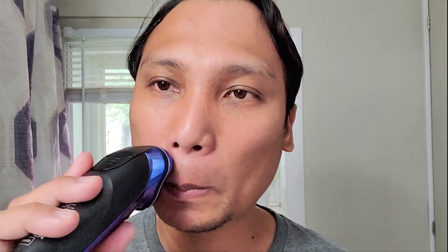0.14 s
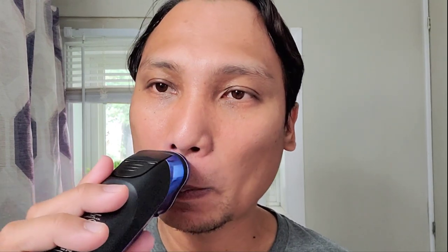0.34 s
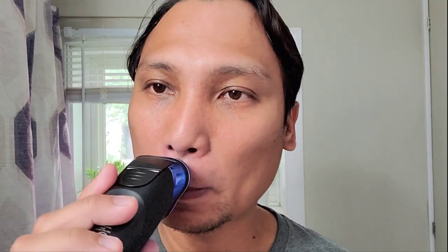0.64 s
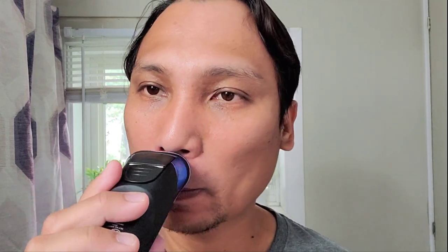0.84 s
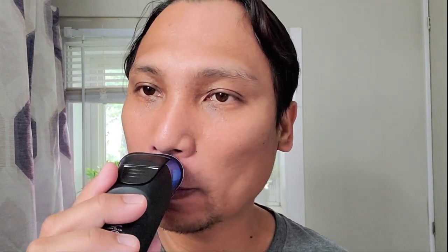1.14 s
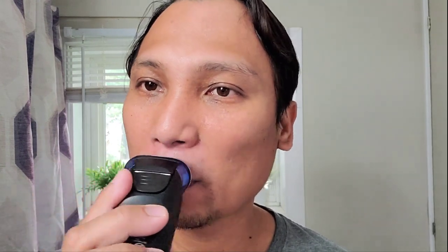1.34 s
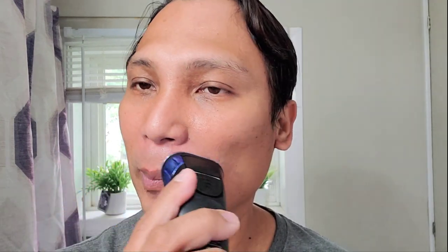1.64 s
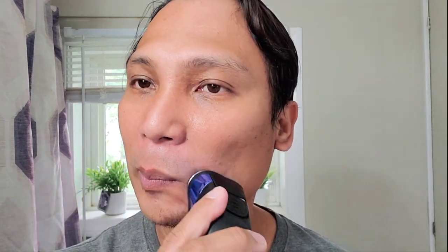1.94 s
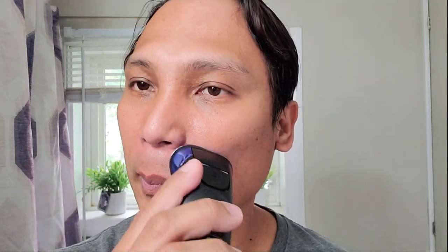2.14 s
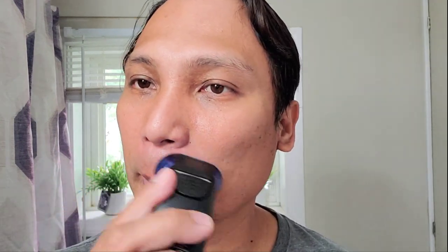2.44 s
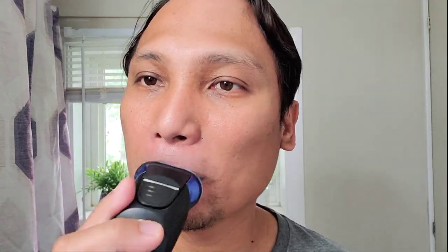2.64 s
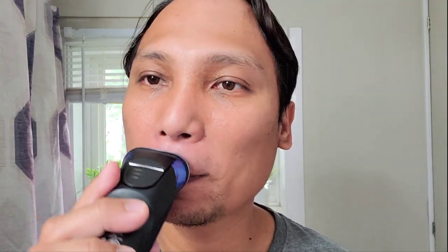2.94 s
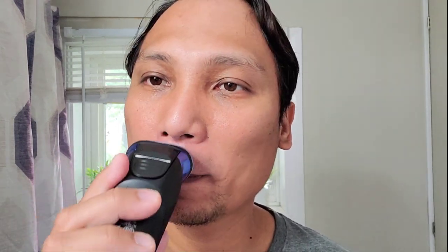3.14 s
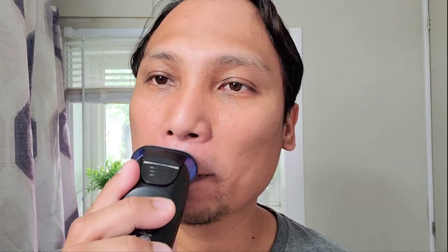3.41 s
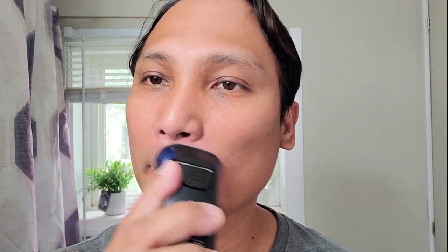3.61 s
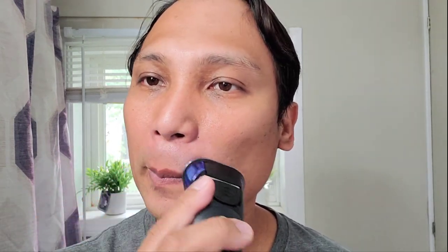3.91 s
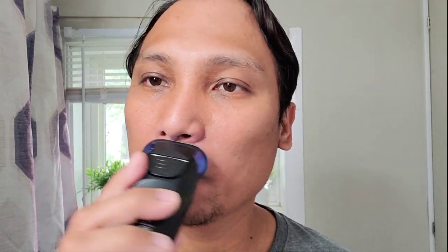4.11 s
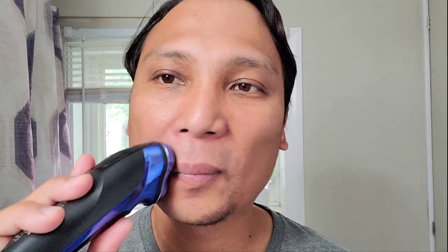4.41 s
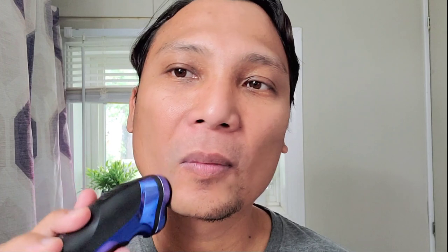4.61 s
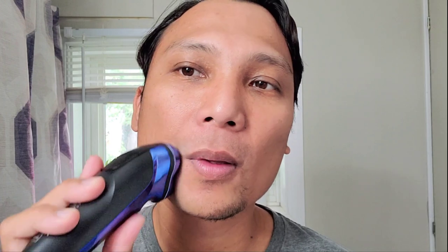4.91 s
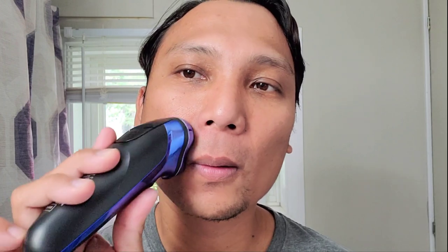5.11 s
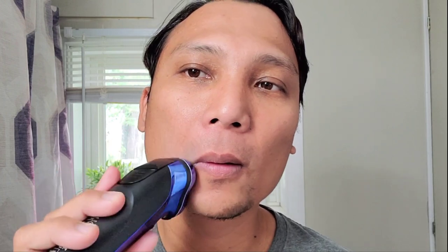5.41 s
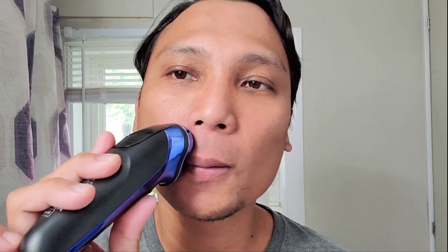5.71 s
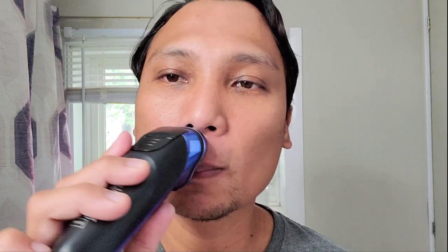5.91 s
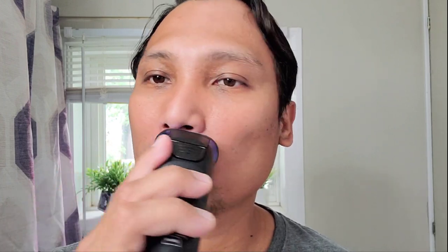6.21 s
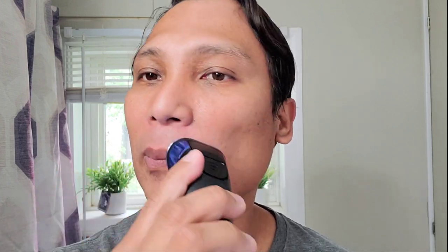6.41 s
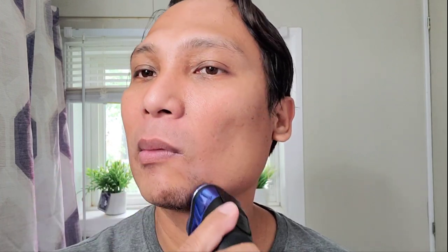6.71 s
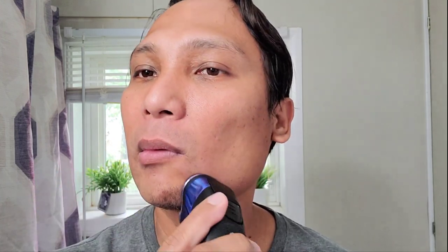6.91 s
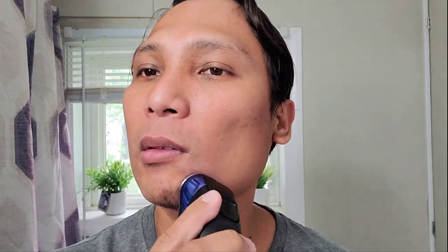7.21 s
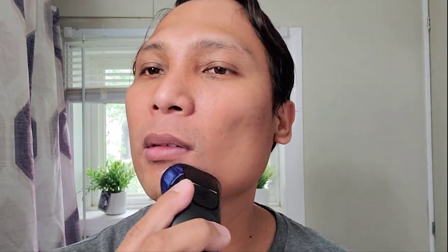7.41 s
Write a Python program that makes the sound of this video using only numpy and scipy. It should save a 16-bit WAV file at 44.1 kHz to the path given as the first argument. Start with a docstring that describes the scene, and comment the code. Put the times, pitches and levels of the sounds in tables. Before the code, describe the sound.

Close, bright shaver buzz with fluttering gear whine and metallic hiss over the lip, turning rougher and cracklier as it reaches the chin.

```python
"""A cordless rotary shaver works over lip and then chin, close to two microphones in a small room.
From the start its meshing gears whine with a throb at each wheel turn, and random contacts excite the
resonances of body and steel caps as rattle, ring and hiss; brief squeals come early and late.
Midway one cap tips off the skin and rings freely. At the end, on the chin, the crackle of cut stubble
grows, caps scrape and bristles snap: clumped impulses through the resonances of hair, cap and head."""
import sys
import numpy as np
from scipy import signal
from scipy.fft import rfft, irfft
from scipy.io import wavfile
from scipy.ndimage import map_coordinates

SR = 44100
rng = np.random.default_rng(int(sys.argv[2]) if len(sys.argv) > 2 else 0)


def to_wav(sig):
    """Store sig (one row per channel, or 1-D mono) as 16-bit WAV at the path in sys.argv[1].

    Samples outside -1..1 are clipped; the rate is SR.
    """
    pcm = np.clip(np.atleast_2d(sig), -1, 1) * 32767
    pcm = np.round(pcm).astype(np.int16)
    wavfile.write(sys.argv[1], SR, pcm.T)  # frames by channels


N = 332955
TIME = np.arange(N) / SR   # s
HZ = np.maximum(np.arange(N // 2 + 1) * SR / N, 1)
SIDES = np.array([[1], [-1]])   # sign of a left-right difference
WHEEL_RATIO, CUTTER_RATIO = 13 / 48, 20 / 51   # turns per motor turn

# Motor slowed by pressure on the skin. Each row: time in seconds, mean speed in turns per second.
MOTOR_SPEED = [(0.0, 117.7), (0.23, 117.0), (0.7, 118.0), (1.7, 118.7), (2.27, 116.85), (2.48, 118.5),
               (2.6, 117.3), (2.78, 118.35), (3.45, 117.4), (3.78, 117.6), (4.1, 116.5), (4.3, 117.1),
               (4.47, 116.6), (4.7, 117.9), (5.0, 116.9), (5.35, 117.0), (5.8, 116.3), (6.48, 116.5),
               (6.7, 115.2), (6.97, 114.8), (7.12, 115.35), (7.55, 115.55)]
# Low sounds. Each row: time in seconds, relative room rumble in dB, relative handle drone in dB.
LOW_LEVELS = [(0.0, -70.5, -80), (0.4, -68.5, -74), (1.9, -68, -74.5), (3.05, -70, -74.5),
              (3.2, -71.5, -76), (4.0, -71.5, -74.5), (5.8, -74, -82), (6.8, -75.5, -78), (7.3, -72.5, -80),
              (7.55, -74, -73)]
# Shaver moving across the face. Each row: time in seconds, left minus right in dB before scaling.
FACE_PLACE = [(0.0, -14), (0.8, -2), (1.15, -2), (2.04, 1.5), (2.46, 2), (4.28, 0), (4.42, -11),
              (4.85, -12), (5.5, -15), (5.85, -19), (6.27, -5.5), (6.65, 0.5), (7.55, 2)]
# Cutters biting into stubble. Each row: centre in seconds, half length in seconds, relative crackle in dB.
STUBBLE_BITES = [(1.754, 0.096, -58.5), (1.977, 0.03, -58), (2.267, 0.016, -56), (2.675, 0.034, -58),
                 (3.378, .03, -62), (4.15, 0.053, -58.5), (6.73, 0.042, -62), (6.816, 0.049, -56),
                 (6.883, 0.032, -56), (6.983, .035, -74), (7.185, 0.045, -53.5), (7.44, 0.024, -54),
                 (7.491, 0.018, -50.5), (7.54, 0.027, -52.5)]
# Bristles against a cap. Each row: resonance in Hz, width in Hz, relative level in dB.
BRISTLE_MODES = [(3120, 550, -3), (4020, 400, 4), (4700, 440, 10), (6150, 700, 2), (7200, 940, 0.5)]


def from_db(db):
    """Decibels are logarithmic: 20 dB is a factor of ten in amplitude."""
    return np.exp(np.asarray(db) * (np.log(10) / 20))


def rms_one(x):
    """Normalization to unit mean power."""
    return x / np.sqrt(np.mean(x ** 2) + 1e-20)


def in_time(rows):
    """Linear interpolation of each column of a curve at every sample."""
    s, *columns = np.transpose(rows)
    return [np.interp(TIME, s, column) for column in columns]


def over_hz(points):
    """Interpolation of a short spectrum on a logarithmic frequency axis."""
    hz, value = np.transpose(points)
    return np.interp(np.log(HZ), np.log(hz), value)


def drift(rate):
    """Low-passed noise: smooth chance that changes about `rate` times a second; unit rms."""
    pole = np.exp(-80 * np.pi * rate / SR)   # on a grid of every 40th sample
    noise = rng.standard_normal(N // 40 + 2002)
    slow = signal.lfilter([1], [1, -2 * pole, pole * pole], noise)[2000:]
    return np.interp(np.arange(N) / 40, np.arange(len(slow)), rms_one(slow))


def swells(rows):
    """Gaussian gain envelopes of (centre s, half length s, dB), summed in power."""
    power = sum(from_db(db) ** 2 * np.exp(-np.minimum(((TIME - s) / half) ** 2, 50))
                for s, half, db in rows)
    return np.sqrt(power)


def strikes(rows, decay_s):
    """Impulsive excitation of (s, dB): sudden onset, then exponential decay."""
    return sum(from_db(db) * (TIME >= s) * np.exp(-np.abs(TIME - s) / decay_s) for s, db in rows)


def resonances(modes):
    """Modal response: the powers of steep-sided resonances add."""
    power = sum((from_db(db) / (1 + (2 * (HZ - hz) / width) ** 2)) ** 2 for hz, width, db in modes)
    return np.sqrt(power)


def grains(per_s, spread_db):
    """Shot noise: two independent streams of random contacts of uneven size."""
    born = rng.random((2, N)) < per_s / SR
    size_db = spread_db * np.minimum(rng.exponential(1, (2, N)), 4)
    return born * rng.choice([-1, 1], (2, N)) * from_db(size_db)


def radiate(contacts, gain):
    """Body filtering and spatial coherence: the two sides are more alike in the bass; unit rms."""
    # Each row: frequency in Hz, left-right likeness.
    coherence = [(30, 0.93), (60, 0.82), (200, 0.7), (400, 0.55), (750, 0.77), (1500, 0.7), (2400, 0.72),
                 (4200, 0.52), (7000, 0.22), (15000, 0.05)]
    # Each row: frequency in Hz, left minus right in dB.
    side_balance = [(60, -1.5), (300, -0.5), (1100, -1.5), (2000, 0.5), (3500, -0.5), (4400, -4), (5400, 1),
                    (6800, -1), (7600, 11), (8300, 7), (9200, 1), (11800, 1), (14300, -3.5), (15600, -0.5)]
    mid, side = rfft(contacts) * gain
    alike = np.clip(over_hz(coherence), -1, 1)
    pair = np.sqrt(1 + alike) * mid + SIDES * np.sqrt(1 - alike) * side
    return rms_one(irfft(pair * from_db(SIDES * over_hz(side_balance) / 2), N))


def tone(turns, fading, rate, lead=0.):
    """Multipath fading: reflections off moving hand and face alter a sine on each side; rms 1."""
    angle = (2 * np.pi * ((turns + rng.random()) % 1)).astype(np.float32)
    cos, sin = np.cos(angle), np.sin(angle)
    pair = []
    for shift in (lead / 2, -lead / 2):
        in_phase = np.cos(shift) + fading * drift(rate)
        quadrature = np.sin(shift) + fading * drift(rate)
        pair.append(in_phase * cos - quadrature * sin)
    return np.sqrt(2 / (1 + 2 * fading ** 2)) * np.array(pair)


def face_echo(x):
    """Comb filtering: reflections over swaying paths keep shifting the colour; unit rms."""
    # Reflections off face, hand and wall.
    # Each row: mean delay in seconds, sway of the delay in seconds, strength as a share.
    echo_paths = [(.0013, 0.00012, 0.22), (.0047, 0.0001, 0.22), (.0085, .00008, 0.18)]
    out = x.copy()
    for delay, sway, strength in echo_paths:
        for side in range(2):
            lag = delay * rng.uniform(.85, 1.15) + sway * drift(0.45)
            out[side] += strength * np.interp(TIME - lag, TIME, x[side])
    return rms_one(out)


def arrive(x):
    """Interaural-type delay: the moving head reaches the two microphones at different moments."""
    # Each row: time in seconds, delay of the right behind the left in seconds.
    right_delay = [(0.0, 0.0), (1.5, 0.0), (1.8, 7.5e-5), (2.55, 8e-5), (2.9, -1e-5), (3.55, -1e-5),
                   (3.9, 8e-5), (4.2, 8e-5), (4.6, -2.5e-5), (5.9, -2.5e-5), (6.5, 7e-5), (7.55, 8e-5)]
    lag_s, = in_time(right_delay)
    right = map_coordinates(x[1], [(TIME - lag_s) * SR], order=5, mode="nearest")
    return np.array([x[0], right])


def room_rumble():
    """Background noise: random pressure shaped by a spectrum that is strongest in the bass."""
    # Each row: frequency in Hz, relative level in dB per Hz.
    rumble_spectrum = [(15, -1), (28, 0.5), (48, -9.5), (85, -4.5), (120, -9.5), (155, -19), (190, -37),
                       (300, -30), (550, -33), (1200, -42)]
    rumble_db, _ = in_time(LOW_LEVELS)
    noise = rng.standard_normal((2, N))
    return from_db(rumble_db + 2.5) * radiate(noise, from_db(over_hz(rumble_spectrum)))


def room(x):
    """Diffuse reverberation: convolution with decaying noise, different on each side."""
    t60_s = 0.07
    t = TIME[:SR // 2]
    tail = rng.standard_normal((2, len(t))) * from_db(-60 * t / t60_s) * (t > .004)
    tail = tail / np.sqrt(np.sum(tail ** 2, axis=1, keepdims=True))
    return signal.fftconvolve(x, tail, axes=1)[:, :N]


def handle_drone():
    """Modal excitation: dense random contacts sound the low resonances of the handle."""
    # Each row: resonance in Hz, width in Hz, relative level in dB.
    handle_modes = [(237, 26, 1.6), (276, 58, 1.9), (306, 24, -1.2), (399, 50, -2)]
    _, drone_db = in_time(LOW_LEVELS)
    return from_db(drone_db - 1.0 + 2.0 * drift(8.6)) * radiate(grains(5000, 2.1), resonances(handle_modes))


def knocks():
    """Impact response: the floating heads give way and clatter softly in their springy mount."""
    # Each row: time in seconds, relative level in dB.
    blows = [(2.269, -62), (2.675, -63.5), (4.142, -63), (6.85, -68), (6.89, -78), (7.22, -57.5)]
    # Each row: resonance in Hz, width in Hz, relative level in dB.
    mount_modes = [(417, 70, -1), (805, 140, -1), (960, 110, 2)]
    clatter = radiate(grains(3300, 1.2), resonances(mount_modes))
    return from_db(2.5) * strikes(blows, decay_s=0.025) * clatter


def squeals():
    """Friction instability: a catching cutter makes its cap squeal briefly, the higher the rougher. Besides
    these squeals, around 1.5 s a longer, steadier tone near 2820 Hz rises and fades."""
    # Brief cap squeals, plus a longer, steadier tone near 2820 Hz around 1.5 s that is no squeal. Each row:
    # centre in seconds, half length in seconds, mean frequency in Hz, level in dB.
    brief_tones = [(.15, 0.032, 14400, -54), (.45, .025, 14500, -55), (1.47, 0.012, 3090, -51),
                   (1.52, 0.098, 2820, -51.5), (2.093, 0.045, 2670, -55), (2.25, 0.03, 14500, -51),
                   (7.166, 0.033, 2800, -51), (7.192, 0.025, 2300, -46), (7.288, 0.066, 2880, -50.5),
                   (7.22, 0.031, 942, -59), (7.493, 0.024, 2910, -41.5), (7.526, 0.02, 840, -52.5)]
    out = 0
    for s, half, hz, db in brief_tones:
        roughness = 0.01153 * np.sqrt(hz / 3000) * drift(146)
        turns = np.cumsum(hz * (1 + roughness)) / SR
        bell = np.exp(-np.minimum(((TIME - s) / half) ** 2, 50))
        out = out + from_db(db) * bell * tone(turns, fading=0.18, rate=150)
    return out


def buzz(turns):
    """Order tones: weaker lines of the drive and of blades passing the slots follow the rotation."""
    # Each row: multiple of motor speed, relative level in dB.
    drive_lines = [(5.49, -83), (6, -73), (9, -69.5), (16.48, -73), (18.42, -69), (20, -68), (20.79, -66.5),
                   (21.57, -69), (25, -66.5), (26.28, -65), (27, -65), (44.5, -63)]
    # Each row: times per cutter turn, relative level in dB.
    blade_lines = [(29, -68), (58, -60), (61, -59), (64, -66), (72, -67), (90, -60), (93, -64), (96, -64),
                   (116, -63), (119, -65)]
    # One blade line sings as the cutters skim the skin. Each row: time in seconds, level in dB.
    skim_level = [(0.0, -61), (1.4, -65.5), (2.3, -56.5), (4.0, -54.5), (4.9, -66.5), (5.4, -66),
                  (6.0, -57), (7.1, -54.5), (7.55, -79)]
    skim_order = 87            # times per cutter turn
    fading_per_order = 0.073   # high tones fade more in the reflections
    blade_slack = 0.00051      # coupling play: flutter as a share of the motor speed
    drive = sum(from_db(db) * tone(order * turns, fading=fading_per_order * order, rate=4.8)
                for order, db in drive_lines)
    flutter = np.cumsum(blade_slack * in_time(MOTOR_SPEED)[0] * drift(25.3)) / SR
    cutter_turns = CUTTER_RATIO * (turns + flutter)
    blades = sum(from_db(db) * tone(order * cutter_turns, fading=1.0, rate=3.9, lead=1.0)
                 for order, db in blade_lines)
    skim = tone(skim_order * cutter_turns, fading=0.82, rate=4.9, lead=1.0)
    return from_db(-2.0) * (drive + blades) + from_db(in_time(skim_level)[0]) * skim


def chin_scrape():
    """Stick and release: bristles drag over the caps, snap and knock on the hollow head."""
    # Scrapes of the caps over the chin. Each row: peak in seconds, relative level in dB.
    scrape_peaks = [(6.805, -67), (6.85, -53), (6.888, -43), (6.912, -60), (6.975, -51), (7.226, -57),
                    (7.494, -50), (7.53, -52)]
    # Single stiff bristles against a cap. Each row: time in seconds, relative level in dB.
    bristle_snaps = [(6.843, -46), (6.847, -38), (6.8595, -37), (6.879, -44), (6.889, -36), (6.893, -37),
                     (6.9125, -44), (6.9395, -49), (6.9748, -40), (7.167, -38), (7.228, -46), (7.4415, -45),
                     (7.485, -40), (7.494, -43), (7.5, -37), (7.51, -48), (7.5247, -36)]
    # Hollow head. Each row: resonance in Hz, width in Hz, relative level in dB.
    hollow_modes = [(400, 36, -5), (580, 160, -16), (770, 180, -3), (980, 110, -10), (1120, 46, 2),
                    (1990, 110, -3), (2310, 49, 3)]
    rise_s, fall_s = 0.018, 0.017   # time constants
    low_cut_hz = 440
    drag = 0
    for s, db in scrape_peaks:
        age = np.maximum((s - TIME) / rise_s, (TIME - s) / fall_s)
        drag = drag + from_db(db) * np.exp(-np.minimum(age, 50))
    low_cut = 1 / np.sqrt(1 + (low_cut_hz / HZ) ** 10)
    hollow = radiate(grains(930, 6.4), resonances(hollow_modes) * low_cut)
    grit = radiate(grains(1400, 4.7), resonances(BRISTLE_MODES))
    snap_gain = resonances(BRISTLE_MODES) + from_db(-14) * resonances(hollow_modes)
    cracks = strikes(bristle_snaps, decay_s=0.0018) * radiate(grains(15000, 1.0), snap_gain)
    return drag * (hollow + from_db(4) * grit) + cracks


def stubble(turns):
    """Fracture noise: hairs are sheared in clumps; a thick one gives a short crack of its own."""
    # Colour of a cut hair. Each row: frequency in Hz, relative level in dB per Hz.
    hair_spectrum = [(1000, -31), (2500, 3.5), (6000, 7.5), (8500, 4.5), (9600, -0.5), (10800, 2),
                     (12000, 0.5), (13300, 4), (14400, 6), (15700, 1.5)]
    # Single thick hairs. Each row: time in seconds, relative peak in dB.
    thick_hairs = [(0.4379, -46), (1.918, -59), (2.2433, -50), (2.2657, -47), (3.86, -45), (4.1315, -54),
                   (6.688, -51), (6.8453, -46), (6.887, -45), (6.9377, -48), (6.979, -47), (7.044, -45),
                   (7.494, -50)]
    lip_db, chin_db = -58.5, -56   # relative level of fine stubble between bites
    chin_s, glide_s = 6.64, 0.089
    hair = from_db(over_hz(hair_spectrum))
    fine_db = np.interp(TIME, [chin_s, chin_s + glide_s], [lip_db, chin_db])
    cutting = np.hypot(from_db(fine_db + 0.5 * drift(7.7)), swells(STUBBLE_BITES))
    clumps = from_db(.5 * np.cos(2 * np.pi * CUTTER_RATIO * turns) + 0.88 * drift(28))
    crackle = cutting * radiate(grains(11000, 0.93) * clumps, hair)
    cracks = strikes(thick_hairs, decay_s=0.0033) * radiate(grains(17000, 2.3), hair)
    return from_db(8.5) * crackle + from_db(8.0) * cracks


def chatter(turns):
    """Cyclostationary noise: burr contacts recur each round and slowly reseat, plus loose ones."""
    # Each row: rounds per motor turn, share of the chatter's power.
    repeats = [(CUTTER_RATIO, 0.17), (CUTTER_RATIO / 2, 0.07), (1, 0.09)]
    seating_s = 0.35   # time constant of the changing pattern
    loose_share = 1 - sum(share for _, share in repeats)
    out = np.sqrt(loose_share) * rms_one(grains(10000, 2.1))
    for ratio, share in repeats:
        count = int(turns[-1] * ratio) + 3
        size = N // count
        keep = np.exp(-size / SR / seating_s)
        burrs = from_db(2.17 * np.minimum(rng.exponential(1, size), 4))
        fresh = rng.standard_normal((2, count, size))
        start = rng.standard_normal((2, 1, size))
        rounds, _ = signal.lfilter([np.sqrt(1 - keep ** 2)], [1, -keep], fresh, axis=1, zi=start)
        place = (turns - turns[0]) * ratio * size
        pair = [np.interp(place, np.arange(count * size), side.ravel()) for side in rounds * burrs]
        out = out + np.sqrt(share) * rms_one(np.array(pair))
    return out


def gearbox_rattle(turns):
    """Amplitude modulation: gear contacts swell with the wheel and excite the gearbox modes."""
    # Each row: resonance in Hz, width in Hz, relative level in dB.
    gearbox_modes = [(716, 37, -13.5), (830, 214, -12.5), (1034, 136, -12.5), (1112, 32, -14),
                     (1346, 174, -8.5), (1590, 247, -3.5), (1810, 71, -13)]
    wheel = np.cos(2 * np.pi * WHEEL_RATIO * turns)
    gears = radiate(grains(9000, 1.7) * from_db(1.0 * wheel), resonances(gearbox_modes))
    return from_db(-55.0) * face_echo(gears)


def head(turns):
    """Forced resonance: cutters chatter in time with their turning into body, caps and slots."""
    # Level between bites. Each row: time in seconds, relative body rattle in dB, relative cap ring in dB.
    head_levels = [(0.05, -46.5, -47), (0.25, -46, -48.5), (0.7, -47, -45), (1.1, -46, -46.5),
                   (1.5, -48, -45.5), (1.9, -47.5, -44), (2.16, -48, -47.5), (2.42, -48.5, -44.5),
                   (2.6, -47, -45), (2.73, -47, -45.5), (3.3, -47.5, -46), (3.76, -47.5, -44.5),
                   (4.01, -48.5, -46.5), (4.28, -47, -45.5), (4.55, -46.5, -47.5), (4.69, -51, -48.5),
                   (4.98, -51, -47.5), (5.27, -47.5, -47), (5.5, -48.5, -46.5), (5.7, -51.5, -47.5),
                   (5.9, -47.5, -45), (6.06, -46.5, -47), (6.35, -46.5, -43.5), (6.55, -48, -45.5),
                   (6.72, -45, -44), (7.02, -48, -44.5), (7.35, -48, -46)]
    # Uneven rubbing of the blades. Each row: times per cutter turn, relative swing in dB.
    blade_rub = [(3, 0.56), (5, 0.5), (6, 0), (12, 0), (18, 1.06)]
    # One cap tips off the skin. Each row: centre in seconds, half length in seconds, level in dB.
    cap_lifts = [(4.44, 0.079, -46), (4.59, 0.05, -48), (5.24, 0.076, -48.5), (6.16, 0.07, -48),
                 (6.31, 0.08, -49)]
    # Four bodies. Each row: resonance in Hz, width in Hz, relative level in dB.
    housing_modes, steel_modes = [(2052, 180, -7.5), (2180, 450, -6.5), (2460, 243, -1.5), (2717, 160, -1),
                                  (2834, 92, 1), (3030, 320, 0.5), (3264, 275, 1), (3770, 340, -6.5)], [(4000, 400, -1), (4460, 1230, 0.94), (5090, 430, 0.19),
                                                   (5450, 290, 2.1)]
    slot_modes, free_cap_modes = [(6090, 960, 5.5), (6810, 600, 7), (7430, 690, -4.5)], [(4260, 350, 3), (4580, 210, 5.5), (4970, 180, 5),
                                                 (5340, 53, 12.5)]
    hiss_db = -50.5   # steady shearing at the slots
    bite_rattle_db, bite_ring_db, bite_hiss_db = 8, 2.5, -3   # added to the bite level
    rattle_db, ring_db = in_time(head_levels)
    pan_db = 0.5 + 0.1 * in_time(FACE_PLACE)[0]   # the head stays near the middle
    bite = swells(STUBBLE_BITES)
    grip_db = 0.5 * drift(9.3)   # uneven pressure of the hand

    wheel, cutter = (np.cos(2 * np.pi * ratio * turns) for ratio in (WHEEL_RATIO, CUTTER_RATIO))
    blade = sum(db * np.cos(2 * np.pi * (times * CUTTER_RATIO * turns + rng.random()))
                for times, db in blade_rub)
    rattle_swing = from_db(0.4 * wheel + 0.53 * cutter + 2.7 * blade + 1.0 * drift(24))
    ring_swing = from_db(0.78 * cutter + 0.31 * blade + 0.3 * wheel + 1.05 * drift(43))
    hiss_swing = from_db(0.88 * cutter + .5 * blade)
    free_swing = from_db(2.3 * cutter + 1.3 * blade)

    contacts = chatter(turns)   # shared by rattle and hiss
    rattle = radiate(contacts * rattle_swing, resonances(housing_modes))
    ring = radiate(chatter(turns) * ring_swing, resonances(steel_modes))
    hiss = radiate(contacts * hiss_swing, resonances(slot_modes))
    free_cap = radiate(grains(6600, 2.2) * free_swing, resonances(free_cap_modes))
    parts = ((rattle, rattle_db - 0.6, bite_rattle_db),
             (ring, ring_db + 0.23, bite_ring_db),
             (hiss, hiss_db, bite_hiss_db))
    caps = sum(np.hypot(from_db(db), bite * from_db(bite_db)) * face_echo(part)
               for part, db, bite_db in parts)
    caps = caps + swells(cap_lifts) * free_cap
    return arrive(caps) * from_db(grip_db + SIDES * pan_db / 2)


def whine_levels():
    """Order spectrum: level in dB of motor orders 12, 13, 14 and 15 at every sample."""
    # Order 13 is the 13-tooth pinion's mesh, which dies away when the head runs free; order 15 is
    # strongest as the shaver leaves the lip. Each row: time in seconds, level in dB.
    lower, mesh, upper, top = [(0.0, -55), (1.5, -54), (2.0, -62.5), (2.42, -63), (2.7, -55.5),
                               (3.3, -56.5), (3.8, -55.5), (4.08, -61), (4.4, -54), (4.7, -58), (4.95, -75),
                               (5.15, -56), (5.45, -55), (5.6, -69), (5.9, -56.5), (6.45, -59), (6.95, -64),
                               (7.1, -62), (7.55, -63)], [(0.0, -55), (0.2, -74), (0.47, -55.5), (0.7, -55),
                                                   (1.7, -48), (2.2, -51), (2.72, -50.5), (3.7, -50.5),
                                                   (4.1, -52), (4.4, -51.5), (4.78, -80), (5.05, -65),
                                                   (5.4, -59), (5.8, -58.5), (6.45, -50), (7.1, -57.5),
                                                   (7.55, -55.5)], [(0.0, -54), (0.2, -56.5), (1.2, -54),
                                                                 (1.9, -53.5), (2.22, -50), (2.42, -54.5),
                                                                 (3.6, -57.5), (3.95, -52), (4.7, -53.5),
                                                                 (5.35, -62), (5.65, -51.5), (5.9, -66),
                                                                 (6.4, -58), (6.9, -55.5), (7.3, -52.5),
                                                                 (7.55, -51.5)], [(0.0, -69), (1.0, -78),
                                                                                     (4.35, -71),
                                                                                     (4.76, -54),
                                                                                     (5.3, -62),
                                                                                     (6.35, -63.5),
                                                                                     (6.6, -78),
                                                                                     (7.55, -70)]
    return [in_time(curve)[0] for curve in (lower, mesh, upper, top)]


def backlash(turns):
    """Periodic friction: teeth run tight once per wheel turn and grate more the harder they whine."""
    # Each row: resonance in Hz, width in Hz, relative level in dB.
    tooth_modes = [(1423, 180, 4), (1540, 52, -11), (1625, 48, 2)]
    _, mesh_db, upper_db, _ = whine_levels()
    tight = from_db(6.5 * np.cos(2 * np.pi * WHEEL_RATIO * turns))
    grating = radiate(grains(12000, 0.91) * tight, resonances(tooth_modes))
    return from_db(-12.0) * np.hypot(from_db(mesh_db), from_db(upper_db)) * grating


def gear_whine(turns):
    """Mesh tone with sidebands: the pinion chops the whine and the eccentric wheel makes it swell."""
    # Multiples of motor speed.
    mesh_orders = (12, 13, 14, 15)
    # Each row: left minus right in dB, share of the body's swing, mean left lead in radians.
    side_patterns = [(3.5, 0.46, 0.24), (1, 0.84, 0.74), (-5, 0.33, 0.71), (0, -0.044, 1.1)]
    # Throb of order 14, deepest under the chin. Each row: time in seconds, depth as a share.
    upper_throb = [(0.0, 0.17), (4.3, 0.17), (5.0, 0.44), (6.0, 0.5), (7.55, 1)]
    above, below = 0.63, 0.27   # mean sideband amplitudes as shares of the mesh tone
    place_db = 1.3 * in_time(FACE_PLACE)[0]
    wheel = np.exp(2j * np.pi * WHEEL_RATIO * turns)
    depth, = in_time(upper_throb)
    uneven = from_db(1 * drift(5.8))   # changing load
    mesh_throb = 1 + uneven * (above * wheel + below / wheel)
    order_14_throb = (1 + depth * (wheel + 0.1 / wheel)) / np.hypot(1, depth)
    throbs = (1, mesh_throb, order_14_throb, 1)
    out = 0
    for order, level_db, throb, pattern in zip(mesh_orders, whine_levels(), throbs, side_patterns):
        pan_db, swing, lead = pattern
        line = throb * np.exp(2j * np.pi * order * turns)
        pan = from_db(SIDES * (pan_db + swing * place_db) / 2)
        phase = np.exp(.5j * SIDES * (lead + 0.28 * drift(1.0)))
        heard = line * pan / np.hypot(*pan) * phase
        waver_db = 0.28 * drift(3.8)   # the moving hand
        out = out + 2 * heard.real * from_db(level_db + waver_db)
    return out


def scene():
    """Superposition: the shaver's sources share one rotation, joined by reverberation and rumble."""
    first_throb_s = 0.0174   # the wheel's swell peaks here
    speed, = in_time(MOTOR_SPEED)
    turns = np.cumsum(speed * (1 + 0.00092 * drift(11.38))) / SR   # hairs brake the motor a little
    turns = turns - np.interp(first_throb_s, TIME, turns)
    soft = handle_drone() + knocks() + squeals() + buzz(turns)
    hairs = chin_scrape() + stubble(turns)
    machine = gearbox_rattle(turns) + head(turns) + backlash(turns)
    cutting = soft + hairs + machine
    return room_rumble() + from_db(-11.5) * room(cutting) + cutting + gear_whine(turns)


def record(dry):
    """Low-pass filtering: the top is cut steeply."""
    cutoff_hz = 15800
    return irfft(rfft(dry) / np.sqrt(1 + (HZ / cutoff_hz) ** 400), N)


dry = scene()
out = record(dry)
to_wav(out)
```